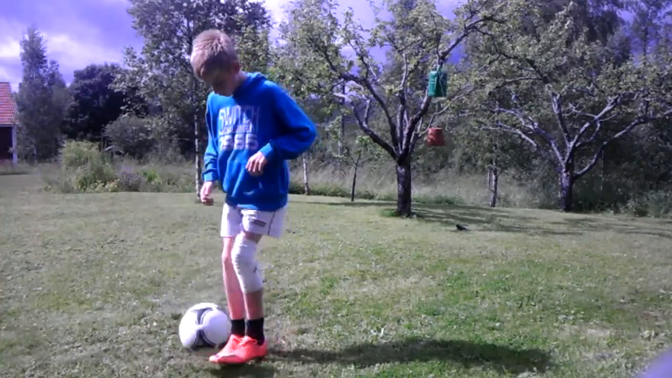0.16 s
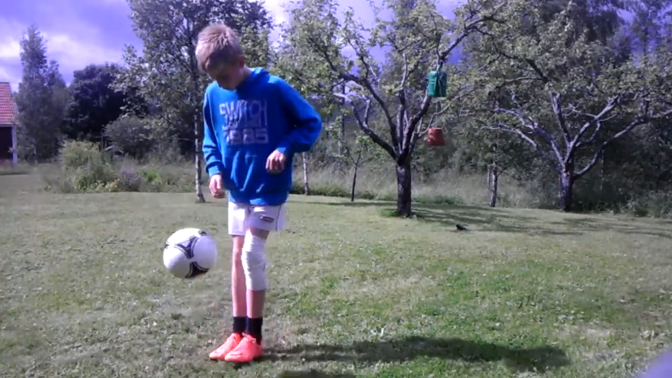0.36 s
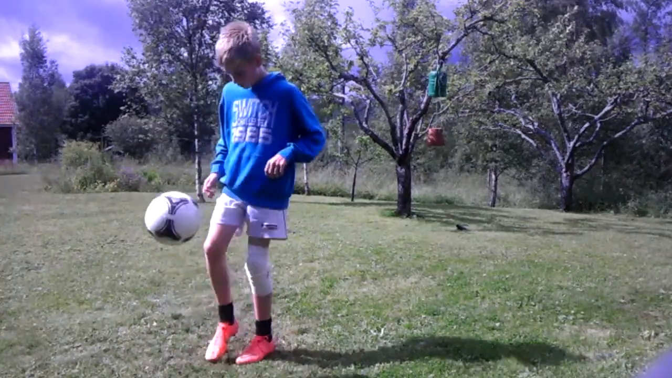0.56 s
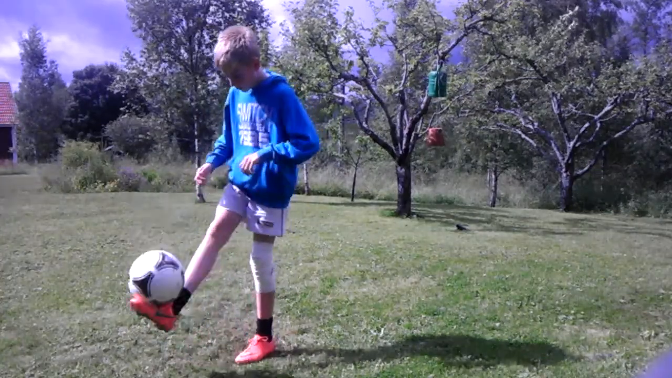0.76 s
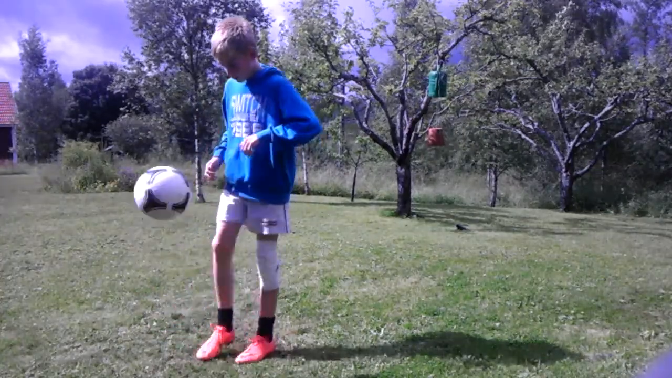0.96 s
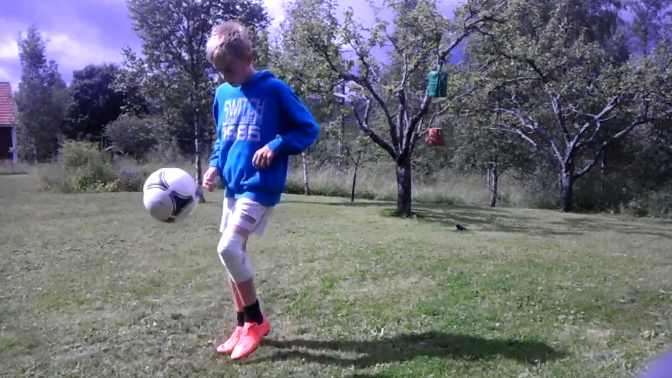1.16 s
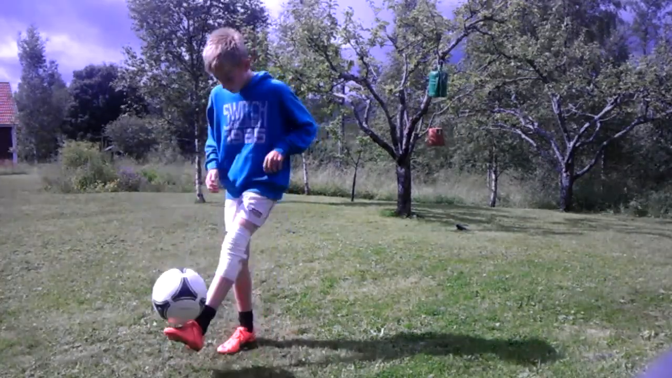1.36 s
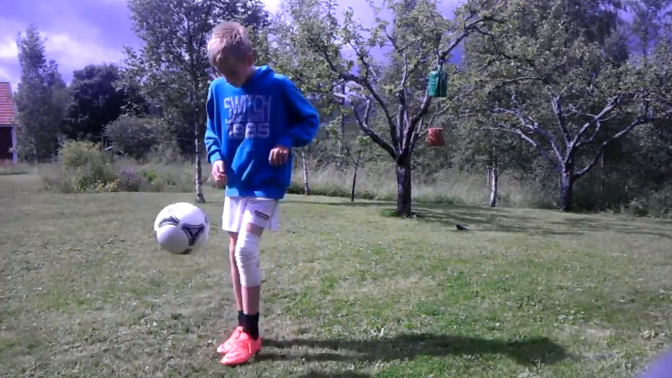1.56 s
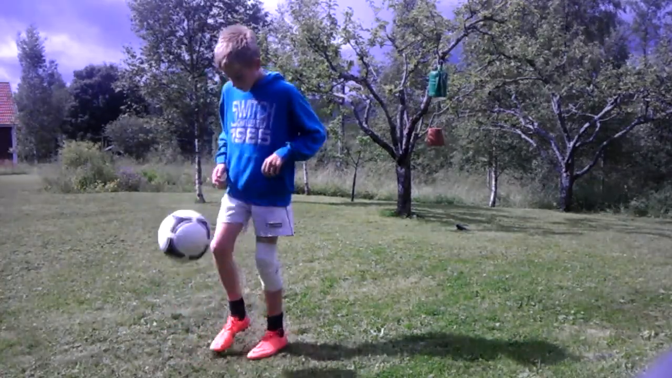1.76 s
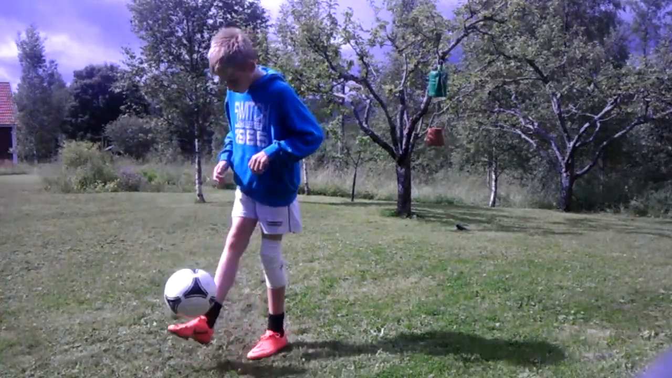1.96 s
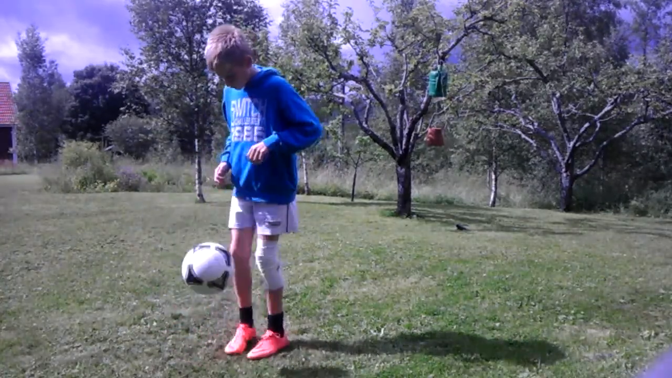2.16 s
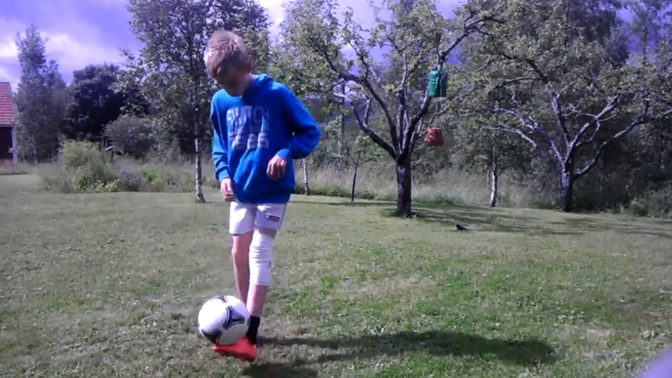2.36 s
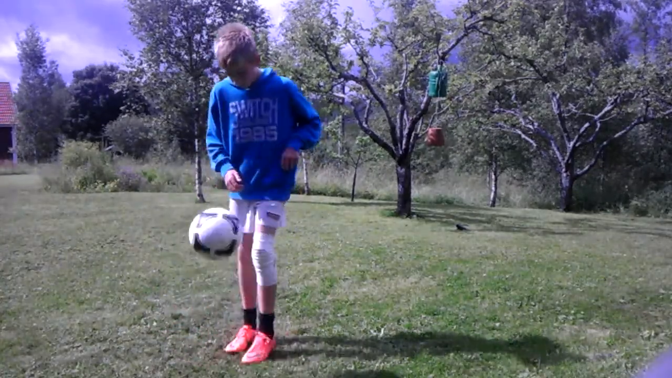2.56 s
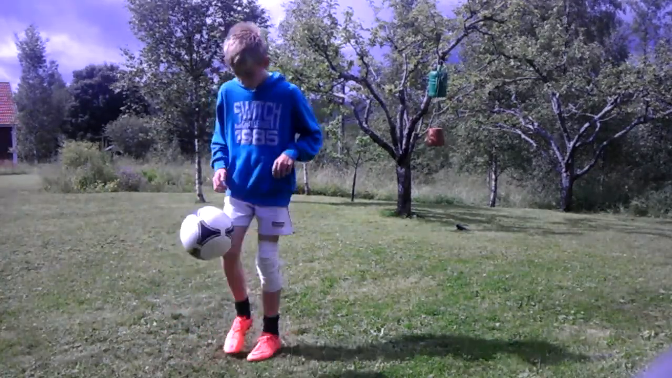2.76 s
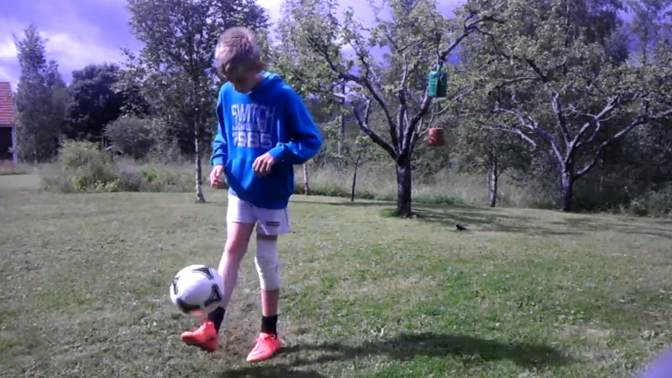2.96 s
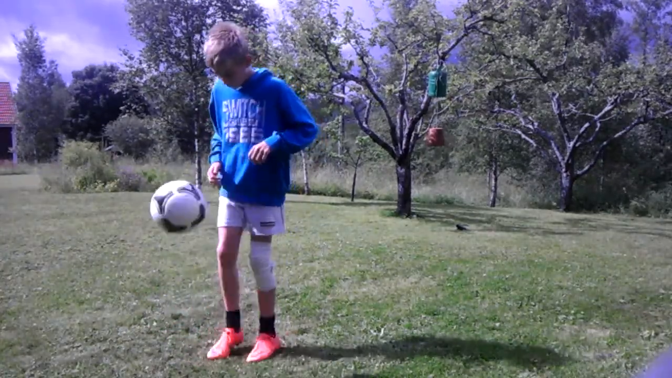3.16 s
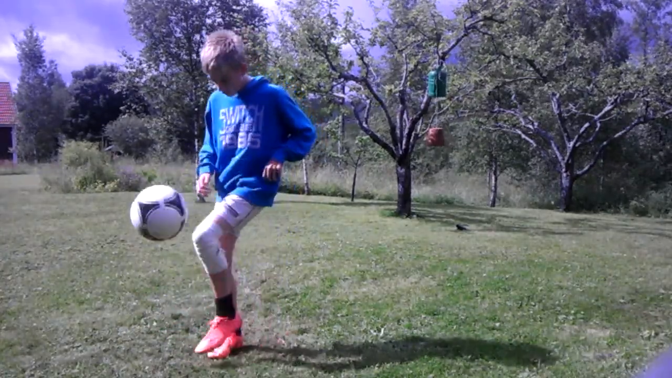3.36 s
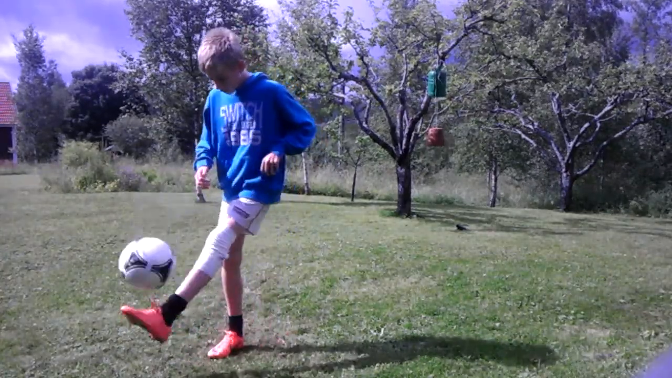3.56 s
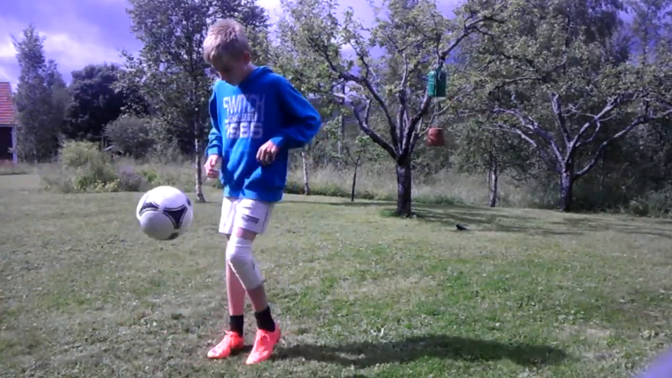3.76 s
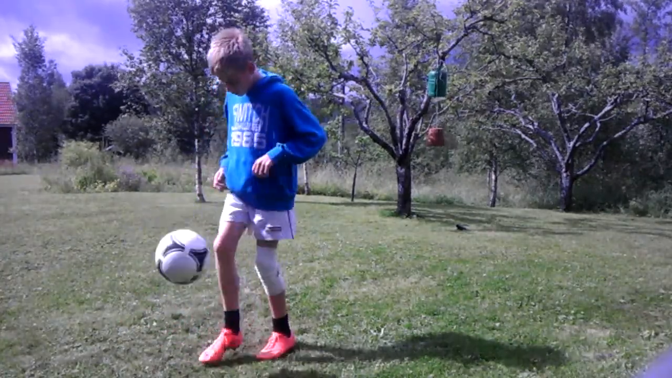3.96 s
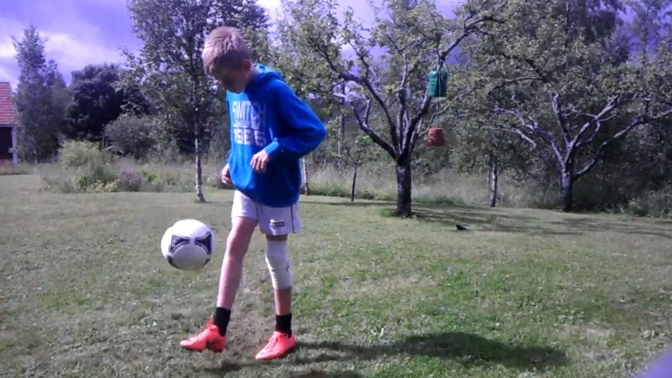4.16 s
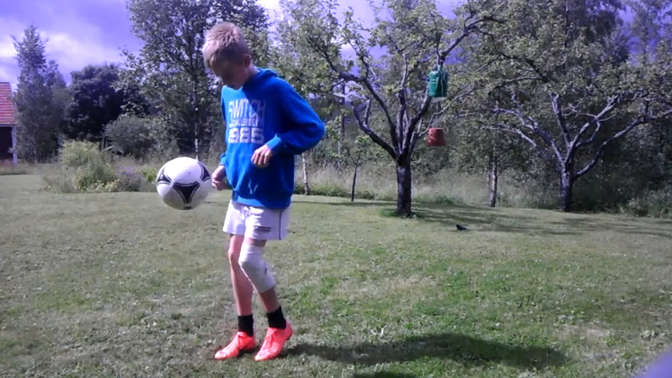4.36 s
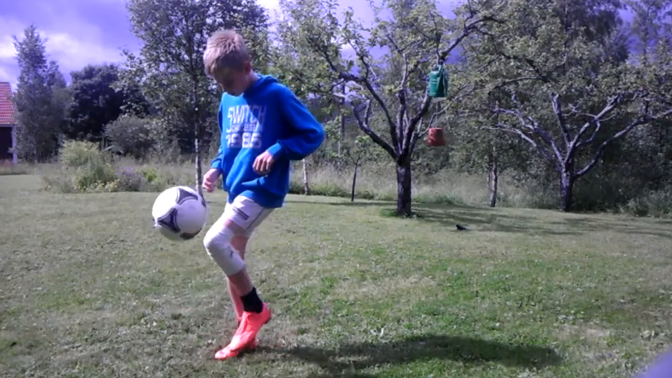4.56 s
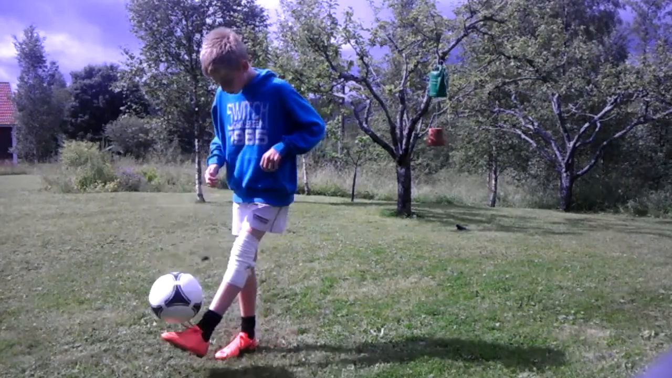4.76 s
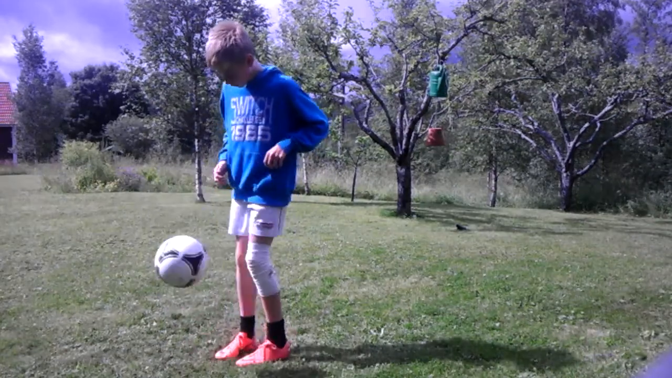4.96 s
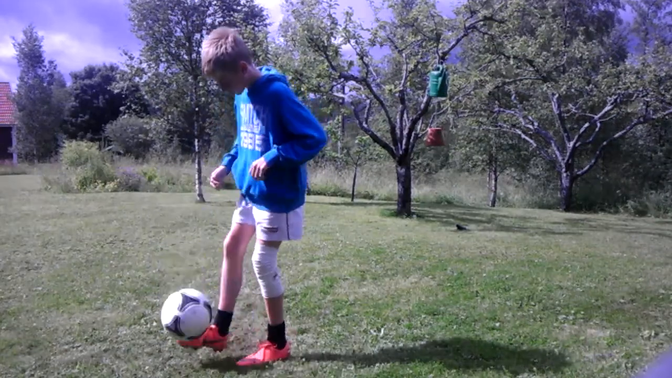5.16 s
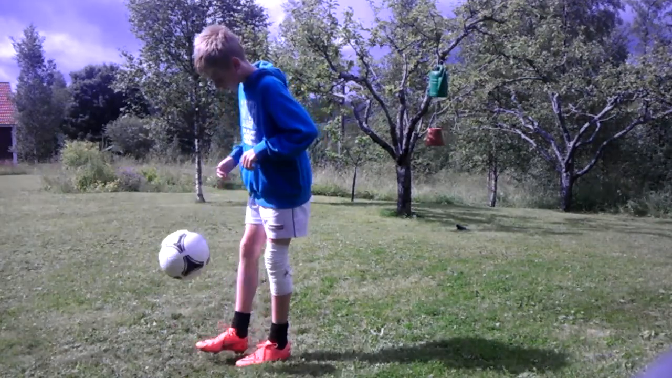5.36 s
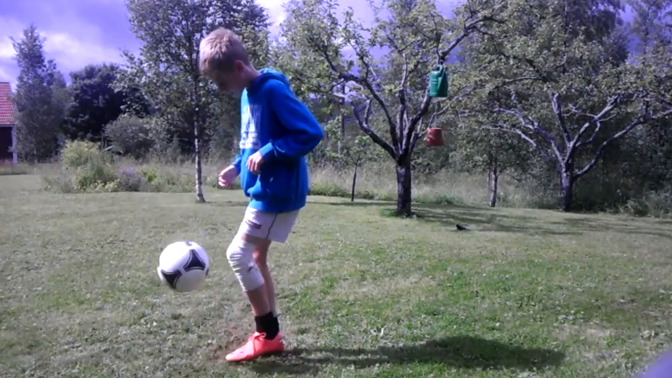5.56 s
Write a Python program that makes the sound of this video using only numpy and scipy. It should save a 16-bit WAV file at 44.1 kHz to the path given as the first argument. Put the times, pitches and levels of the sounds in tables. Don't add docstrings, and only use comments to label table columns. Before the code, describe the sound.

Someone juggles a football on a garden lawn, a few metres from a small stereo camera microphone. Ten touches come roughly every half second, each a skin slap with a short hollow thump and scuffed tail. Low lumpy wind rumble is heavy at first, then eases. Leaves hiss quietly, and a small bird chirps faintly to the left early on.

```python
import sys
import numpy as np
from scipy import signal
from scipy.fft import rfft, irfft
from scipy.io import wavfile

SR = 44100
rng = np.random.default_rng(int(sys.argv[2]) if len(sys.argv) > 2 else 0)


def volts_from_decibels(level):
    exponent = np.asarray(level, float) / 20
    return 10 ** exponent


def store_pcm(level_fs):
    pcm = np.round(np.clip(level_fs, -1, 1) * 32767).astype(np.int16)
    wavfile.write(sys.argv[1], SR, np.atleast_2d(pcm).T)


N = 247842


def rms_one(x):
    return x / np.sqrt(np.mean(x ** 2) + 1e-20)


def peak_one(x):
    return x / np.abs(x).max()


def in_time(rows):
    s, *columns = np.transpose(rows)
    return [np.interp(np.arange(N) / SR, s, c) for c in columns]


def at_hz(points, hz):
    curve = np.array(points)
    return np.interp(np.log(hz), np.log(curve[:, 0]), curve[:, 1])


def drift(rate):
    hop, settle = 40, 2000
    r = np.exp(-2 * np.pi * rate * hop / SR)
    noise = rng.standard_normal(N // hop + settle + 2)
    slow = signal.lfilter([1], [1, -2 * r, r * r], noise)[settle:]
    return np.interp(np.arange(N) / hop, np.arange(len(slow)), rms_one(slow))


def ring(force, hz, t60):
    r, w = volts_from_decibels(-60 / (t60 * SR)), 2 * np.pi * hz / SR
    return signal.lfilter([0, np.sin(w)], [1, -2 * r * np.cos(w), r * r], force + 1e-18)


def band_noise(kind, hz, noise, order=2):
    return signal.sosfilt(signal.butter(order, hz, kind, fs=SR, output="sos"), noise)


def bands(low_hz, count, size):
    # (frequency [Hz], likeness [0-1])
    likeness = [(60, 0.75), (200, 1), (600, 0.45), (1400, 0.12), (15000, 0.2)]
    white = rng.standard_normal((2, 2, size))
    for k in range(count):
        low = low_hz * 2 ** (k / 2)
        hz = low * 2 ** .25
        mid, side = band_noise("band", [low, low * np.sqrt(2)], white[k % 2])
        alike = np.clip(at_hz(likeness, hz), 0, 1)
        yield hz, np.sqrt(1 + alike) * mid + np.sqrt(1 - alike) * side * [[1], [-1]]


def add(out, s, sound):
    i = round(s * SR)
    a, b = max(i, 0), min(i + sound.shape[-1], N)
    out[..., a:b] += sound[..., a - i:b - i]


def thumps():
    # (time [s], peak level [dB], pitch [Hz])
    squashes = [(0.3784, -24, 146), (0.9539, -19, 176), (1.5627, -20, 177), (2.1099, -23.5, 167),
                (2.535, -27, 162), (3.1215, -24, 176), (3.7043, -20.5, 176), (4.245, -23.5, 184),
                (4.9137, -25.5, 152), (5.3573, -26.5, 171)]
    out, t = np.zeros((2, N)), np.arange(-600, 2400) / SR
    for s, db, hz in squashes:
        for side, lag_s in enumerate((0, .0002)):
            u = t - lag_s
            swell = np.exp(-np.abs((u - .002) / np.where(u < .002, .0075, .0058)) ** 2.0)
            tail = volts_from_decibels(-11.5) * (u > 0) * np.exp(-u / 0.0053)
            turns = hz * (u - 23.4 * u * u * np.exp(-np.abs(u) / 0.12))
            add(out[side], s + t[0], volts_from_decibels(db) * (swell + tail) * np.cos(2 * np.pi * turns))
    return out


def strikes():
    # (time [s], slap level [dB], shell level [dB], cavity ring level [dB], strongest ring [Hz])
    touches = [
        (0.3646, -42, -43, -40.5, 1070),
        (0.9439, -19, -39, -28, 1190),
        (1.5523, -13, -28.5, -30.5, 1230),
        (2.099, -19.5, -39, -48, 1590),
        (2.526, -24, -28, -28, 1300),
        (3.1124, -39.5, -37.5, -42, 1410),
        (3.6938, -22.5, -34, -30, 1210),
        (4.2338, -26.5, -37, -36, 1740),
        (4.9036, -22, -33, -28.5, 1470),
        (5.347, -47, -44.5, -40.5, 1400),
    ]
    # (frequency [Hz], level [dB], t60 [s])
    shell_modes = [(378, 8.5, 0.031), (519, -7, 0.05), (270, -8, 0.088)]
    # (frequency [Hz], level [dB], t60 [s])
    cavity_modes = [(904, 2, 0.064), (1040, -1.5, 0.065), (1159, -5, 0.055), (1395, 1.5, 0.016),
                    (1465, -11, 0.03), (1790, 2, 0.0057), (2000, -13.5, 0.064), (2220, 3.5, 0.0094),
                    (2560, -33, 0.047)]
    hard_db, snap = -36, 1.5
    out, t = np.zeros((2, N)), np.arange(9000) / SR
    for s, slap_db, shell_db, ring_db, ring_hz in touches:
        noise = rng.standard_normal((5, len(t)))

        release_db = -16 + snap * max(shell_db - hard_db, 0)
        crack = np.exp(-np.abs(t - .0012) / np.where(t < .0012, .00015, .0006))
        crack = crack + volts_from_decibels(-21.0) * np.exp(-t / 0.0014)
        release = volts_from_decibels(release_db) * np.exp(-np.abs(t - .007) / 0.0003)
        clean_snap = 1.9 * np.exp(-((t - .0011) / .00003) ** 2)
        skin = noise[:2] * (crack + release) + clean_snap
        slap = (band_noise("band", [2300, 7500], skin) + 0.33 * skin) * volts_from_decibels([[1.5], [-5]])

        push = np.exp(-((t - .0032) / 0.0002) ** 2)
        rub = .5 * np.exp(-((t - .008) / 0.0053) ** 2) * (noise[2] + 0.34 * noise[3:])
        shell = sum(volts_from_decibels(db) * ring(push + rub, hz, t60) for hz, db, t60 in shell_modes)

        rebound = 1.76 * np.exp(-((t - .0018) / 0.00081) ** 2) + np.exp(-((t - .009) / 0.0039) ** 2)
        shake = rebound * (noise[3:] - 0.094 * noise[:2:-1])
        cavity = 0
        for hz, db, t60 in cavity_modes:
            favour_db = rng.normal(0, 1.5) - 28 * np.abs(np.log2(hz / ring_hz))
            cavity = cavity + volts_from_decibels(db + favour_db) * peak_one(ring(shake, hz, t60))

        add(out, s, volts_from_decibels(slap_db + 1.5) * peak_one(slap))
        add(out, s, volts_from_decibels(shell_db + 12) * peak_one(shell))
        add(out, s, volts_from_decibels(ring_db + 9.0) * peak_one(cavity))
    return out


def echoes(x):
    # (delay [s], level [dB], left minus right [dB])
    walls = [
        (.033, -22, 5),
        (.063, -20.5, -1),
    ]
    dull = band_noise("low", 450, x.mean(axis=0))
    out = 0
    for lag_s, db, pan_db in walls:
        out = out + volts_from_decibels(db + pan_db * np.array([[.5], [-.5]])) * np.roll(dull, round(lag_s * SR))
    return out


def scuffs():
    # (time [s], level [dB], lag of the swell [s], swell level [dB], brightness [dB per octave])
    brushes = [(.366, -58.5, 0.025, -18, 0), (.943, -49, 0.016, -21, -1), (1.551, -45.5, 0.033, -9, 1),
               (2.098, -50.5, 0.015, -2, 2), (2.526, -46, 0.016, -5, 0), (3.112, -53, 0.075, -14, 1),
               (3.692, -47, 0.032, -12, -0.5), (4.234, -49.5, 0.044, -9, 0), (4.904, -42.5, 0.032, 7, 0.85),
               (5.345, -52, .025, -25, 0)]
    # (frequency [Hz], density [dB per Hz])
    colour = [(400, 7), (700, -1), (1200, -2.5), (2500, -7.5), (5000, -12.5), (9000, -16), (15000, -28)]
    # (frequency [Hz], t60 [s])
    decay = [(300, 0.18), (800, 0.27), (2000, 0.27), (6000, 0.25), (15000, 0.29)]
    out, t = np.zeros((2, N)), np.arange(22000) / SR
    for s, db, lag_s, swell_db, tilt_db in brushes:
        swell = volts_from_decibels(swell_db) * np.exp(-((t - lag_s) / .022) ** 2)
        brush = 0
        for hz, noise in bands(306, count=12, size=len(t)):
            fall_db = -60 * t / at_hz(decay, hz)
            trees = volts_from_decibels(-10.5 + 0.47 * fall_db)
            shape = volts_from_decibels(fall_db) + swell * np.exp(-np.log2(hz / 2900) ** 2 / 0.67) * 0.54 + trees
            band_db = at_hz(colour, hz) + tilt_db * np.log2(hz / 2000)
            brush = brush + volts_from_decibels(band_db) * shape * noise
        add(out, s + 0.0018, volts_from_decibels(db + 14.5) * np.minimum(t / 0.00053, 1) * brush)
    return out * volts_from_decibels(1.8 * drift(96))


def swish():
    # (end time [s], length [s], level [dB])
    sweeps = [
        (4.228, 0.081, -56.5),
    ]
    out = np.zeros((2, N))
    for s, length, db in sweeps:
        t = np.arange(0, length + .05, 1 / SR)
        noise = band_noise("band", [5000, 13000], rng.standard_normal((2, len(t))))
        swell = np.minimum(t / length, np.exp((length - t) / 0.022))
        add(out, s - length, volts_from_decibels(db) * swell * rms_one(noise))
    return out


def eddies(table):
    out, t = np.zeros(N), np.arange(-1500, 1500) / SR
    for s, db, hz, ms in table:
        noise, phase = rng.standard_normal(len(t)), rng.random(2)
        swing = np.exp(-(t / (0.00045 * ms)) ** 2) * np.cos(2 * np.pi * (1.086 * hz * t + phase[0]))
        wake = 0.65 * np.exp(-((t - .002) / (0.0008 * ms)) ** 2)
        wake = wake * np.cos(2 * np.pi * (0.72 * hz * t + phase[1]))
        front = np.exp(-((t + 0.00054 * ms) / (0.00061 * ms)) ** 2)
        rough = rms_one(band_noise("low", 600, band_noise("high", 260, noise), order=5))
        ragged = volts_from_decibels(-14.0 + 0.22 * (db - 0.5)) * front * rough
        add(out, s + t[0], volts_from_decibels(db - 1.0) * (swing + wake + ragged))
    return out


def gusts(table):
    rise_db_per_s, fall_db_per_s, calm_db = 904, 463, -73.5
    t = np.arange(N) / SR
    power = volts_from_decibels(2 * calm_db)
    for s, held, db in table:
        loss_db = rise_db_per_s * np.maximum(s - t, 0) + fall_db_per_s * np.maximum(t - s - held, 0)
        power = power + volts_from_decibels(2 * (db - loss_db))
    return np.sqrt(power)


def wind():
    # (time [s], peak level [dB], frequency [Hz], length [ms])
    left_eddies = [(0.064, -38, 265, 10), (0.098, -23, 246, 8.8), (0.128, -23.5, 477, 24),
                   (0.165, -15, 198, 4.8), (0.183, -10, 230, 5.5), (0.203, -12.5, 308, 6.7),
                   (0.219, -12, 211, 10), (0.243, -19, 231, 17), (0.263, -19, 253, 16),
                   (0.296, -16.5, 170.2, 23), (0.331, -27, 144, 9.9), (0.383, -20, 147, 28),
                   (0.46, -24, 270, 5), (0.501, -34, 212, 16), (0.594, -33, 170, 5.2),
                   (0.753, -33.5, 193, 15), (1.017, -29, 181, 11), (1.337, -43, 198, 15),
                   (2.467, -26, 237, 7.8), (2.564, -24.5, 188, 12), (2.651, -26, 184, 17),
                   (2.701, -20, 181, 5.2), (2.717, -24, 241, 23), (2.773, -13, 233, 1.5),
                   (2.791, -14, 184, 11), (2.834, -21.5, 242, 6.3), (2.852, -30, 210, 5.4),
                   (2.896, -30.5, 138, 9.1), (3.454, -30, 146, 19), (3.541, -40, 153, 8.5)]
    right_eddies = [(0.059, -16, 220, 5.7), (0.076, -20, 180, 17), (0.093, -18, 233, 10.4),
                    (0.115, -10, 250, 9.2), (0.149, -15.5, 266, 6), (0.201, -14, 200, 6.5),
                    (0.217, -11.5, 210, 5.9), (0.272, -22.5, 143, 17.9), (0.311, -24, 161, 4.1),
                    (0.396, -15.5, 207.9, 10.5), (0.419, -18, 169, 19), (0.454, -47, 182, 7.8),
                    (0.475, -35, 238, 6.8), (0.535, -32.5, 170.8, 15), (0.687, -34.5, 212, 8),
                    (0.745, -24, 173, 11), (0.763, -34, 162, 8), (0.794, -24, 140, 4),
                    (0.987, -20.5, 308, 6.3), (1.166, -28.5, 197, 8.8), (1.387, -34, 159, 12),
                    (1.538, -28, 223, 6.4)]
    # (start time [s], held for [s], buffeting level [dB])
    left_gusts = [(0, 0.098, -34.5), (.15, .19, -27), (.36, .16, -41.5), (.57, .07, -44.5), (.72, .21, -48),
                  (.98, .2, -48.5), (1.33, 0.057, -45), (1.58, 0.11, -53.5), (1.8, 0.11, -63),
                  (2.245, 0.066, -41), (2.37, 0.054, -44), (2.46, .2, -46.5), (2.68, .22, -37.5),
                  (2.92, 0.075, -47.5), (3.215, 0.013, -41), (3.36, .19, -42.5), (3.79, .29, -53),
                  (4.14, 0.058, -63), (4.44, 0.031, -51.5), (4.75, 0.013, -64), (5.56, .1, -50.5)]
    right_gusts = [(0.044, .28, -31.5), (.36, .19, -35.5), (.67, 0.028, -45.5), (0.732, 0.055, -37.5),
                   (.85, 0.11, -45), (.99, 0.063, -45.5), (1.1, .13, -51), (1.33, .08, -45.5),
                   (1.58, 0.084, -48.5), (1.8, 0.11, -57), (3.8, .27, -67), (4.44, 0.031, -56),
                   (5.58, .1, -48)]
    # (frequency [Hz], density [dB per Hz])
    buffet = [(25, -28), (50, -8.5), (90, 1.5), (140, 5), (220, -2), (350, -9.5), (600, -24), (1000, -48)]
    lumps_db, crosstalk_db = 3, -13
    hz = np.maximum(np.arange(N // 2 + 1) * SR / N, 1)
    ports = np.array([eddies(left_eddies), eddies(right_eddies)])
    for side, table in enumerate((left_gusts, right_gusts)):
        rumble = rms_one(irfft(rfft(rng.standard_normal(N)) * volts_from_decibels(at_hz(buffet, hz)), N))
        ports[side] += rumble * gusts(table) * volts_from_decibels(lumps_db * drift(30))
    return ports + volts_from_decibels(crosstalk_db) * ports[::-1]


def bird():
    # (time [s], length [s], start pitch [Hz], pitch fall [Hz], level [dB])
    chirps = [
        (1.445, .045, 5700, 300, -69),
        (1.493, 0.029, 5450, 500, -56),
        (1.52, 0.095, 5750, 700, -52.5),
        (1.611, 0.066, 5300, 1200, -52.5),
        (1.655, .055, 5500, 1000, -58),
    ]
    droop = 2.4
    out = np.zeros(N)
    for s, length, hz, fall_hz, db in chirps:
        t, rasp = np.arange(0, length, 1 / SR), drift(150)
        warble = 1 + 0.01 * np.sin(2 * np.pi * 90 * t)
        pitch = (hz - fall_hz * (t / length) ** droop) * warble
        whistle = signal.windows.tukey(len(t), .4) * np.sin(2 * np.pi * np.cumsum(pitch) / SR)
        add(out, s, volts_from_decibels(db - 4.0 + 3.9 * rasp[:len(t)]) * whistle)
    out = out + volts_from_decibels(-5) * np.roll(out, round(0.0068 * SR))
    return out * volts_from_decibels([[1.5], [-5]])


def leaves():
    # (time [s], level [dB])
    air_level = [(0.0, -55.5), (0.36, -58.5), (0.94, -56.5), (1.34, -59), (1.53, -58.5), (1.88, -62.5),
                 (2.43, -61), (2.69, -57), (3.18, -63.5), (3.35, -62), (3.5, -62), (4.15, -64),
                 (4.73, -66.5), (5.09, -63.5), (5.62, -66)]
    # (frequency [Hz], density [dB per Hz])
    colour = [(40, -33), (120, -13.5), (300, -7.5), (600, -4), (1200, -10.5), (2500, -16), (5000, -22),
              (16000, -26)]
    hiss_db = -73
    level_db, = in_time(air_level)
    together = drift(6.3)
    air = 0
    for hz, noise in bands(42.85, count=17, size=N):
        flicker_db = 0.3 * together + 2.14 * drift(28)
        air = air + volts_from_decibels(at_hz(colour, hz) + flicker_db) * noise
    hiss = band_noise("high", 7000, rng.standard_normal((2, N)))
    return volts_from_decibels(level_db + 5.5) * rms_one(air) + volts_from_decibels(hiss_db) * hiss


def whirr():
    hz, t60_s, whirr_db = 584, 0.022, -65.5
    once = ring(rng.standard_normal(N), hz, t60_s)
    tone = rms_one(ring(once, hz, t60_s))
    return volts_from_decibels(whirr_db + 2.9 * drift(13.0)) * tone * volts_from_decibels([[-14], [0]])


def scene():
    ball = thumps() + strikes()
    return ball + echoes(ball) + scuffs() + swish() + wind() + bird() + leaves() + whirr()


def roll_off(x):
    return signal.sosfilt(signal.butter(12, 16650, fs=SR, output="sos"), x)


def record(dry):
    # (frequency [Hz], width [Hz], level [dB])
    left_port = [(5740, 1500, 4), (820, 560, -3), (9300, 6300, -1.5)]
    right_port = [(6680, 2120, -11.5), (8290, 2930, 8), (1070, 1880, 2)]
    low_cut_hz, top_hz = 72.3, 16600
    out = band_noise("high", low_cut_hz, dry, order=3)
    out = signal.sosfilt(signal.cheby2(10, 60, top_hz, fs=SR, output="sos"), out)
    for side, port in enumerate((left_port, right_port)):
        for hz, width_hz, db in port:
            g, w = np.sqrt(volts_from_decibels(db)), 2 * np.pi * hz / SR
            a = np.sin(w) * width_hz / hz / 2
            zeros = [1 + a * g, -2 * np.cos(w), 1 - a * g]
            poles = [1 + a / g, -2 * np.cos(w), 1 - a / g]
            out[side] = signal.lfilter(zeros, poles, out[side])
    return roll_off(out)


dry = scene()
out = record(dry)
store_pcm(out)
```